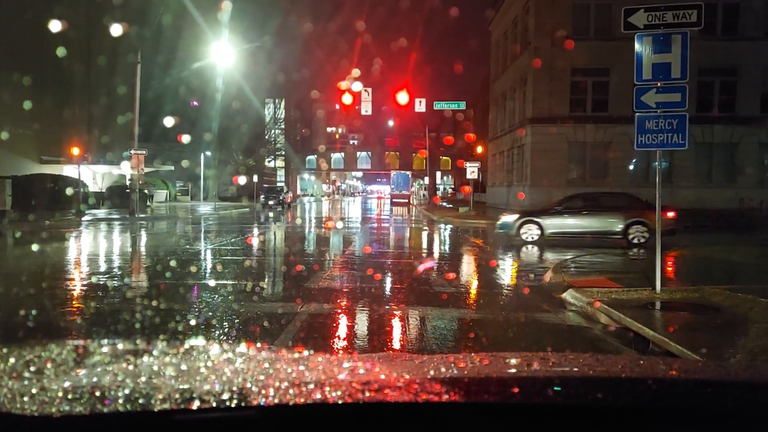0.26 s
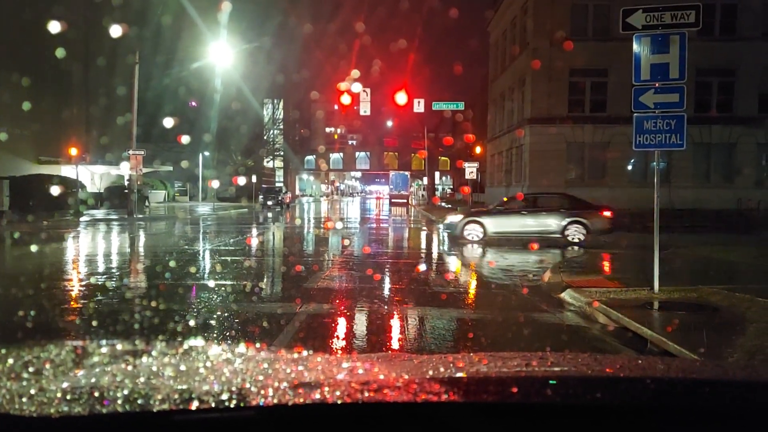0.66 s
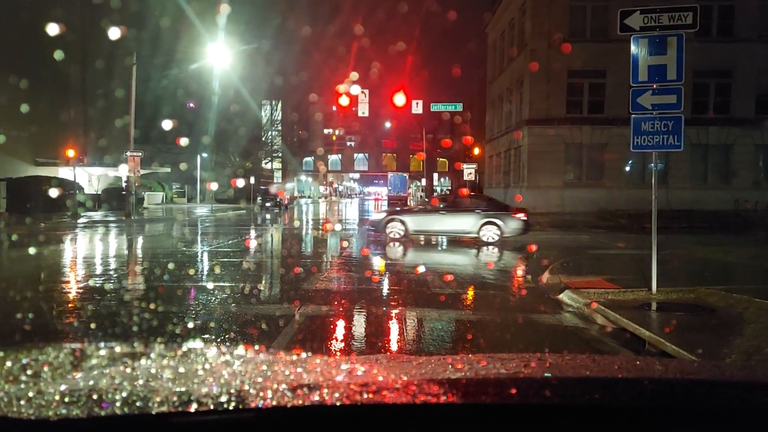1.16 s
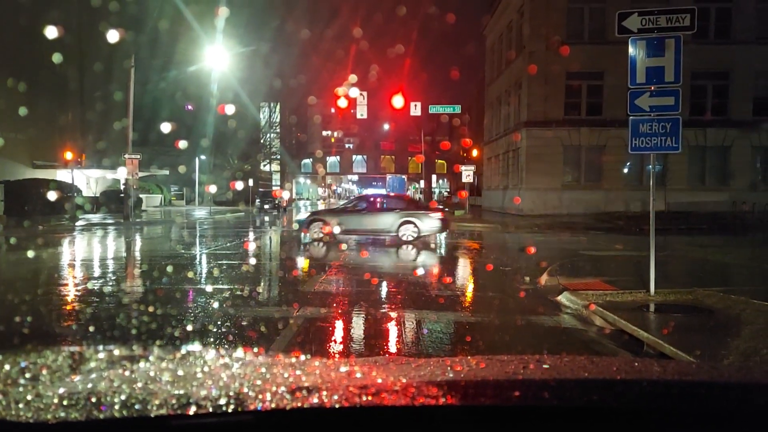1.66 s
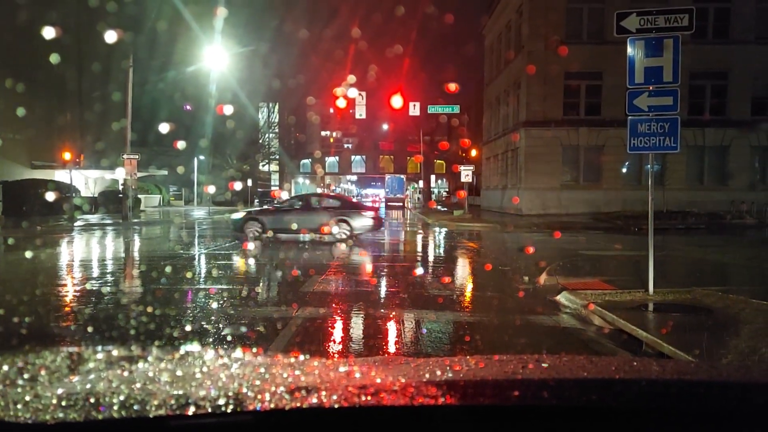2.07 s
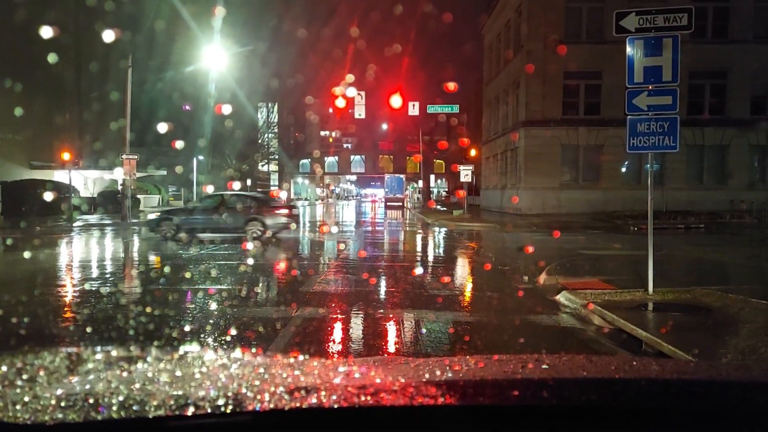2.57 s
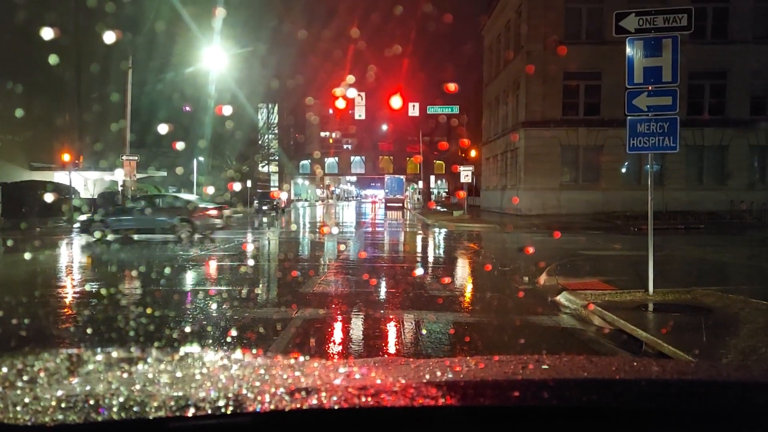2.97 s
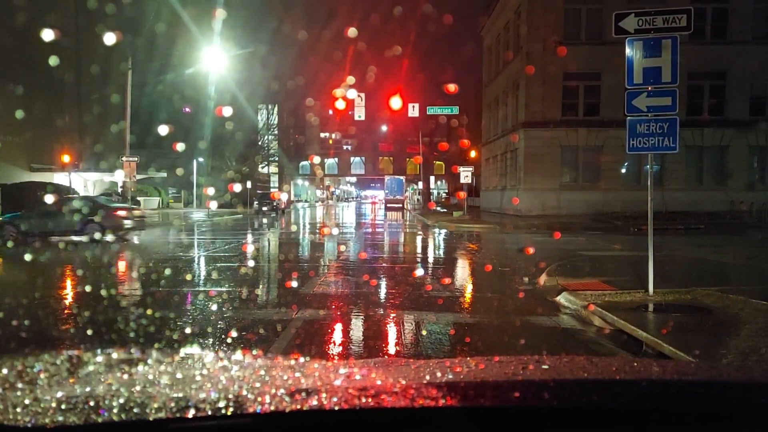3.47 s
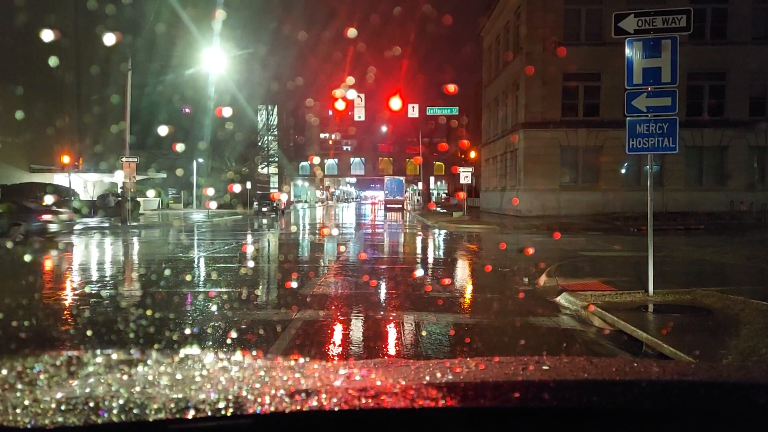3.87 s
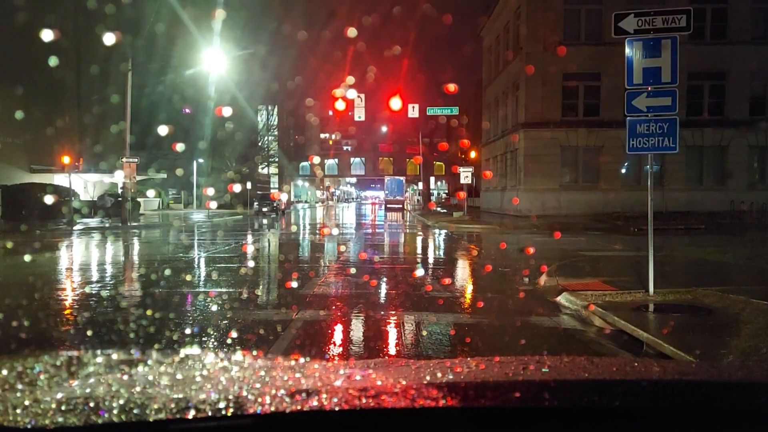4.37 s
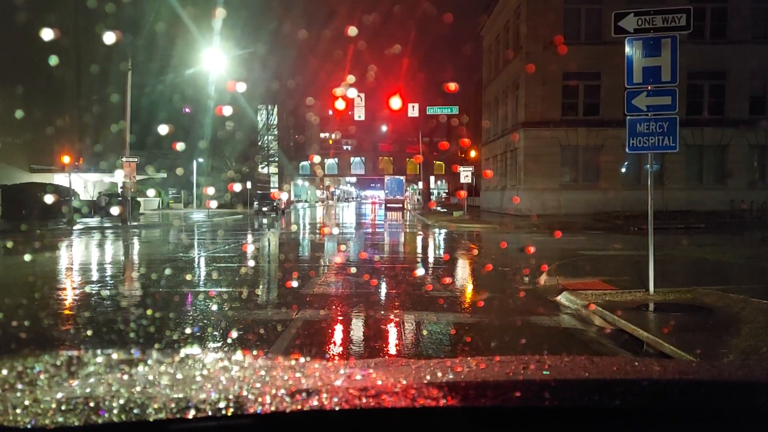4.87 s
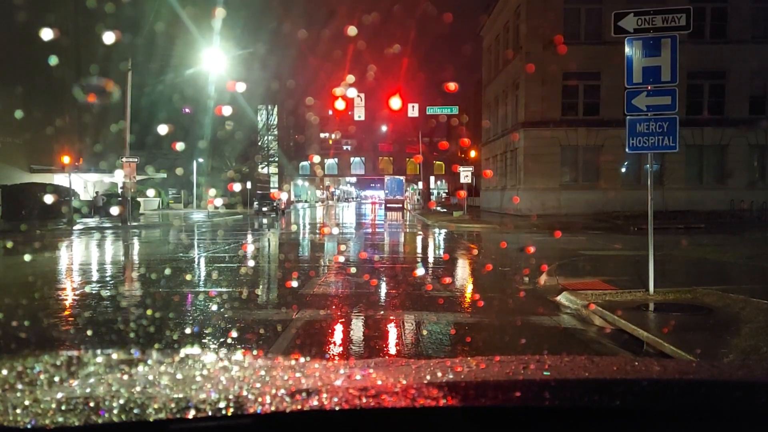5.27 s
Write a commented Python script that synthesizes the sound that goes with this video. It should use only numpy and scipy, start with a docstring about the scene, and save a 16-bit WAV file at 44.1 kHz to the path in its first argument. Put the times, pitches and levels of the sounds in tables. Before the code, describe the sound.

From inside a small padded car cabin, an idling engine and fan hum steadily beneath the dull wash of a wet street. Close, irregular raindrops crack on the windshield and knock on the roof, with smaller drops pattering and drumming between them. The rain starts busy and then eases slightly, each drop dying away quickly. A little past halfway, a thin, barely audible electronic whine sets in.

```python
"""The front seats of a standing car, in the rain, with the engine idling.
Big drops tick sharply on the windshield and thud on the lined steel roof, over a fine patter that
comes in waves. The small padded cabin answers each drop briefly. Underneath lie the hum of engine
and fan and the dull wash of the wet street; a faint electronic whine sets in later."""
import sys
import numpy as np
from scipy import signal
from scipy.fft import rfft, irfft, next_fast_len
from scipy.io import wavfile
from scipy.ndimage import map_coordinates

SR = 44100
rng = np.random.default_rng(int(sys.argv[2]) if len(sys.argv) > 2 else 0)


def wav_record(signal):
    """Record a signal, one row per channel, as 16-bit PCM in the file named by sys.argv[1]."""
    frames = np.transpose(np.atleast_2d(signal))
    bounded = np.clip(frames, -1, 1)
    # unit amplitude maps onto the largest positive 16-bit level
    quanta = np.round(bounded * 32767).astype(np.int16)
    wavfile.write(sys.argv[1], SR, quanta)


N = 244314
TIME_S = np.arange(N) / SR
DROP_TIME_S = np.arange(5120) / SR  # the span of one drop and its tail


def amp(db):
    """Decibels to gain."""
    return 10 ** (np.asarray(db) / 20)


def unit(x):
    """Scale to rms 1."""
    return x / np.sqrt(np.mean(x ** 2) + 1e-20)


def along(points, hz):
    """Read a curve of (freq_hz, value) points on a log frequency axis."""
    freqs, values = np.transpose(points)
    return np.interp(np.log(hz + 1), np.log(freqs + 1), values)


def bump(hz, centre_hz, width_hz):
    """The bell of one resonance, 1 at its centre."""
    return 1 / (1 + (2 * (hz - centre_hz) / width_hz) ** 2)


def wobble(rate_hz):
    """A smooth random drift through rate_hz points a second."""
    coarse = np.linspace(0, N * rate_hz / SR, N // 256)
    knots = rng.standard_normal(int(N * rate_hz / SR) + 4)
    return np.interp(TIME_S * rate_hz, coarse, map_coordinates(knots, [coarse]))


def pan(left_db):
    """Stereo gains that put the left side left_db above the right."""
    return amp(np.array([[left_db], [-left_db]]) / 2)


def eq(x, gain_db):
    """Minimum-phase EQ with the curve gain_db(hz): nothing rings ahead of a hit."""
    size = 2 * next_fast_len(x.shape[-1] // 2 + len(DROP_TIME_S) // 2)
    cepstrum = irfft(np.log(amp(gain_db(np.fft.rfftfreq(size, 1 / SR))) + 1e-6))
    cepstrum[1:size // 2] *= 2
    cepstrum[size // 2 + 1:] = 0
    return irfft(rfft(x, size) * np.exp(rfft(cepstrum)), size)[..., :x.shape[-1]]


def add(track, start_s, sound):
    """Mix a sound into the track at start_s."""
    start = int(np.clip(round(start_s * SR), 0, N - 1))
    track[:, start:start + sound.shape[1]] += sound[:, :N - start]


# How alike left and right are in the cabin: freq_hz, correlation
STEREO_LIKENESS = [(60, 0.93), (150, 0.88), (350, 0.71), (700, 0.4), (1400, -0.13), (3000, 0.013),
                   (8000, -0.048)]

def cabin_noise(size):
    """Diffuse white noise: nearly mono in the bass, wide in the treble."""
    correlation = along(STEREO_LIKENESS, np.fft.rfftfreq(size, 1 / SR))
    angle = np.arccos(correlation) / 2
    mid, side = irfft(rfft(rng.standard_normal((2, size))) * [np.cos(angle), np.sin(angle)], size)
    return np.array([mid + side, mid - side])


# EQ of the background bed: freq_hz, gain_db
WASH_EQ = [(25, -23), (35, -7.5), (52, 12), (72, -5), (120, 2), (160, -12.5), (300, -5.5), (700, -34),
           (3200, -24.5), (4500, -37.5), (9000, -48), (15500, -54)]

def street_wash(level_db=-52):
    """The rumble of the car body and the dull wash of the wet street outside."""
    bed = unit(eq(cabin_noise(N), lambda hz: along(WASH_EQ, hz)))
    return amp(level_db) * bed * pan(0.28)


# When the whine sounds: start_s, end_s
WHINE_CUES = [(3.33, 4.93), (4.97, 5.6)]

def electronic_whine(level_db=-77.5, centre_hz=10850, width_hz=900, line_db=-19, fade_s=0.022):
    """A thin whine: evenly spaced tones in a narrow band of hiss."""
    hiss = unit(eq(rng.standard_normal((2, N)), lambda hz: 20 * np.log10(bump(hz, centre_hz, width_hz))))
    lines = sum(np.sqrt(2) * np.sin(2 * np.pi * hz * TIME_S) for hz in range(10200, 11001, 200))
    gate = sum(np.clip(np.minimum(TIME_S - start_s, end_s - TIME_S) / fade_s, 0, 1)
               for start_s, end_s in WHINE_CUES)
    return amp(level_db) * gate * (hiss + amp(line_db) * lines)


# Harmonics of the idle: firing_multiple, level_db
IDLE_HARMONICS = [(1, -63), (2, -49.5), (3, -54.5), (4, -56), (5, -50), (6, -52)]
# Tones of the cooling fan: pitch_hz, level_db
FAN_TONES = [(98, -52), (196, -64.5)]

def engine(firing_hz=20.87, drift_hz=0.12, flutter_db=2.5):
    """The idling engine and its fan hum through the body, slightly unsteady."""
    firings = firing_hz * TIME_S + np.cumsum(drift_hz * wobble(3.0)) / SR
    idle = [(round(k) * firing_hz, round(k) * firings, db) for k, db in IDLE_HARMONICS]
    fan = [(hz, hz * TIME_S, db) for hz, db in FAN_TONES]
    lean = [(45, 1), (90, 3.7), (130, 1.9)]  # standing waves pull the hum left: freq_hz, left_db
    out = np.zeros((2, N))
    for hz, cycles, level_db in idle + fan:
        tone = np.sqrt(2) * np.sin(2 * np.pi * (cycles + rng.random()))
        out += pan(along(lean, hz)) * amp(level_db + flutter_db * wobble(4.06)) * tone
    return out


# Reverb of the padded cabin, before each drop's tail_scale: freq_hz, t60_s
CABIN_DECAY = [(150, 0.4), (500, 0.14), (3000, 0.11), (12000, 0.081)]

def impact(direct_db, echo_db, tail_scale, spread_s=0.0002246, echo_s=0.0027):
    """One drop at unit energy: a direct click, its bounce off the dashboard and the cabin's tail."""
    hz, age_s, spectrum = signal.stft(cabin_noise(len(DROP_TIME_S)), SR, nperseg=128)
    t60_s = tail_scale * along(CABIN_DECAY, hz)[:, None]
    _, tail = signal.istft(spectrum * amp(-60 * age_s / t60_s), SR, nperseg=128)
    tail = tail[:, :len(DROP_TIME_S)]
    bearing, path = rng.uniform(-0.98, 1, 2)
    arrival_s = spread_s * (1 + bearing * np.array([[1], [-1]]))
    click = amp(direct_db) * np.sinc((DROP_TIME_S - arrival_s) * SR)
    bounce = amp(echo_db) * np.sinc((DROP_TIME_S - arrival_s - echo_s * (1 + 0.232 * path)) * SR)
    hit = click + bounce + tail / np.linalg.norm(tail[0])
    return hit / np.sqrt(np.sum(hit ** 2) / 2)


# Resonances of the steel roof sheet: centre_hz, width_hz, strength_db
SHEET_MODES = [(221, 18, -2), (357, 53, -5.5), (509, 37, 1), (742, 55, 3.5), (1129, 56, 3.5),
               (1374, 28, 4.5)]

def sheet_db(hz):
    """The lift that the roof's resonances give to each frequency."""
    lift = sum(amp(db) * bump(hz, centre_hz, width_hz) for centre_hz, width_hz, db in SHEET_MODES)
    return 20 * np.log10(1 + lift)


def spray_power(send_db=-33, rise_s=0.0072, decay_s=0.012):
    """Fine spray falls back after each big drop: a quick swell of power for the patter."""
    power = np.zeros(N)
    for start_s, level_db, *_ in WINDSHIELD_HITS + ROOF_HITS:
        age_s = np.maximum(TIME_S - start_s, 0)
        power += amp(level_db + send_db) ** 2 * (1 - np.exp(-age_s / rise_s)) * np.exp(-age_s / decay_s)
    return power


# Fader ride of the shower: time_s, level_db
SHOWER_RIDE = [(0.0, -50), (0.14, -54), (0.72, -54.5), (1.11, -54.5), (1.56, -59), (1.96, -56), (2.33, -66),
               (2.57, -63), (2.79, -58.5), (3.02, -65), (3.47, -62), (3.75, -65.5), (4.1, -60),
               (4.74, -57.5), (4.86, -55), (4.97, -69), (5.18, -56.5), (5.54, -68.5)]
# Brief lulls in the rain: centre_s
LULL_CUES = [.085, .73, 1.67, 2.41, 2.74, 3.54, 5.14]

def rain_strength_db(lull_db=-7.5, lull_half_s=0.046):
    """The rain comes in waves, dips in the lulls and swells with the spray of the big drops."""
    shower_db = np.interp(TIME_S, *np.transpose(SHOWER_RIDE))
    lulls = sum(np.exp(-((TIME_S - centre_s) / lull_half_s) ** 2) for centre_s in LULL_CUES)
    return 10 * np.log10(amp(shower_db + lull_db * lulls) ** 2 + spray_power())


def scatter(rate_hz, spread_db, cap_db, direct_db, tail_scale, tint_db, spots):
    """Small drops land at random on a few spots of a panel, each spot with its own tint; rms 1."""
    octaves_hz = 125 * 2 ** np.arange(8)
    tints = [np.column_stack([octaves_hz, tint_db * rng.standard_normal(8)]) for _ in range(spots)]
    responses = [eq(impact(direct_db, direct_db - 4.5, tail_scale), lambda hz: along(tint, hz))
                 for tint in tints]
    moment, weight, place = rng.random((int(rate_hz * N / SR), 3)).T
    size = amp(np.minimum(-spread_db * np.log(1 - weight), cap_db))  # large drops are rare
    out = np.zeros((2, N))
    for spot, response in enumerate(responses):
        here = (place * spots).astype(int) == spot
        blows = np.bincount((moment[here] * N).astype(int), size[here], N)
        out += signal.oaconvolve(blows[None], response, axes=1)[:, :N]
    return unit(out)


# EQ of the small drops on the roof: freq_hz, gain_db
DRUM_EQ = [(70, -21), (125, 3), (160, -4), (220, -5), (380, -8), (600, -15), (850, -22.5), (1200, -20),
           (2000, -46), (4000, -48.5)]
# EQ of the small drops on the glass: freq_hz, gain_db
PATTER_EQ = [(400, -9.5), (700, 3), (900, -2), (1500, 0), (2400, -1), (3200, -1.5), (4400, -9.5),
             (6000, -13.5), (8500, -16.5), (9700, -24), (12700, -22), (13500, -28), (15600, -30)]

def small_drops(drum_db=-48, patter_gain_db=4, drum_follow=0.28):
    """Small drops patter on the glass and drum on the roof; the drumming follows the rain less steeply."""
    rain_db = rain_strength_db()
    drum_ride_db = drum_follow * (rain_db - rain_db.mean())
    drum = scatter(rate_hz=220, spread_db=4.5, cap_db=10.8, direct_db=-9,
                   tail_scale=0.87, tint_db=3, spots=10)
    drum = unit(eq(drum, lambda hz: along(DRUM_EQ, hz) + 0.87 * sheet_db(hz)))
    patter = scatter(rate_hz=420, spread_db=5, cap_db=15, direct_db=-2,
                     tail_scale=0.59, tint_db=2.5, spots=18)
    patter = unit(eq(patter, lambda hz: along(PATTER_EQ, hz)))
    return (amp(drum_ride_db + drum_db) * drum * pan(1.4)
            + amp(rain_db + patter_gain_db) * patter * pan(-1.1))


def dispersed(x, travel_s):
    """Bending waves cross a thin sheet more slowly the lower they are; travel_s is the delay at 1 kHz."""
    size = 2 * x.shape[-1]
    khz = np.fft.rfftfreq(size, 1 / SR) / 1000
    lag_cycles = 2000 * travel_s * np.sqrt(khz)
    return irfft(rfft(x, size) * np.exp(-2j * np.pi * lag_cycles), size)[..., :size // 2]


def steel_mode(pitch_hz, t60_s, attack_s=0.00071):
    """One mode of the steel, struck and dying away."""
    envelope = amp(-60 * DROP_TIME_S / t60_s) * (1 - np.exp(-DROP_TIME_S / attack_s))
    return envelope * np.sin(2 * np.pi * pitch_hz * DROP_TIME_S)


# EQ of a thud through the roof lining: freq_hz, gain_db
THUD_EQ = [(60, -2), (130, 3), (230, 5), (450, 2.5), (700, -0.5), (1200, -11.5), (3000, -16.5), (5000, -26),
           (8500, -34.5), (12500, -37.5), (15000, -66)]
# Big drops on the roof, levels relative: start_s, level_db, ring_hz, splash_db
ROOF_HITS = [(0.001, -21.5, 432, -20), (0.169, -21, 418, -14), (0.238, -29, 209, -9.5),
             (0.538, -28.5, 215, -14.5), (0.676, -30.5, 390, -11.5), (0.795, -29.5, 388, -9),
             (0.891, -19.5, 219, -15.5), (1.164, -27, 368, -15), (1.903, -39, 507, -9.5),
             (2.485, -31, 336, -10), (2.677, -28.5, 470, -17), (2.887, -23, 209, -15.5),
             (3.013, -31.5, 201, -14.5), (3.274, -30, 360, -25), (3.403, -26.5, 220, -23),
             (3.642, -25, 363.6, -21), (4.13, -25.5, 260.6, -24), (4.349, -35, 244, -26),
             (4.389, -26.5, 207, -16.5), (4.835, -33.5, 345, -15), (5, -28.5, 484, -13),
             (5.281, -20, 423, -23)]

def roof_drops(gain_db=22, ring_db=-31, boom_db=-41.5, boom_hz=177.8, plop_db=8, plop_centre_hz=1072):
    """Big drops thud through the lining with a hollow plop; the struck patch rings, the panel booms."""
    out = np.zeros((2, N))
    boom = amp(boom_db) * steel_mode(boom_hz, t60_s=0.22)
    for start_s, level_db, ring_hz, splash_db in ROOF_HITS:
        tilt = [(700, 0), (2000, splash_db + 26.5)]
        plop_hz = plop_centre_hz * 2 ** (0.2 * rng.uniform(-0.97, 1))  # within a fifth of an octave
        plop = lambda hz: plop_db * bump(hz, plop_hz, 0.24 * plop_hz)
        blow = dispersed(impact(direct_db=-9.5, echo_db=-38, tail_scale=1), travel_s=0.001435)
        thud = eq(blow, lambda hz: along(THUD_EQ, hz) + along(tilt, hz) + sheet_db(hz) + plop(hz))
        ring = amp(ring_db) * steel_mode(ring_hz, t60_s=0.082)
        add(out, start_s, amp(level_db + gain_db) * (thud + ring + boom))
    return out


def splashed(hit, droplet_db=-19.5, scatter_s=0.027, droplets=3):
    """A big drop bursts: its droplets land just after it, as quiet copies with the sides swapped."""
    out = hit.copy()
    for wait, size in rng.random((droplets, 2)):
        lag = int(scatter_s * (0.18 + wait) * SR) + 1
        out[:, lag:] += amp(droplet_db) * size * hit[::-1, :-lag]
    return out


# EQ of a tick on the glass: freq_hz, gain_db
TICK_EQ = [(80, 5.5), (200, 1.5), (700, 4.5), (1100, 4.5), (1700, 5.5), (2400, 2.5), (3200, 5.5),
           (4300, -2), (6000, -9), (8500, -14.5), (9800, -23), (12500, -19.5), (13500, -31), (16000, -53)]
# Big drops on the windshield, levels relative: start_s, level_db, body_db, sparkle_db, ping_hz
WINDSHIELD_HITS = [(0.0425, -19.5, -28, -19, 2050), (0.1138, -25.5, -30, -13, 3120),
                   (0.1249, -26.5, -15, -13, 2790), (0.1538, -27, -8, -8.5, 3180),
                   (0.2165, -30.5, 8.5, -10, 1320), (0.2726, -34.5, -12, -6, 2840),
                   (0.3211, -16, -1, -20, 2500), (0.348, -29, -16, -9, 2830),
                   (0.4192, -27.5, -15, -12, 3020), (0.4453, -27.5, -16, -33, 1900),
                   (0.47, -28.5, -10, -13, 3050), (0.776, -24, -5, -13.5, 3280), (0.8001, -26, 4, -9, 1900),
                   (0.8106, -31, 9, -9, 3480), (0.9791, -31, -31, -35, 3470), (1.496, -22.5, -1, -24, 2140),
                   (1.5501, -19, -4.5, -15, 2030), (1.799, -26.5, -23, -16.5, 2100),
                   (2.339, -37, 0, -15, 3040), (2.4844, -25, 3, -24.5, 1550), (2.791, -37, 8.5, -21, 1150),
                   (2.833, -30.5, 6, -11.5, 3060), (3.1376, -37, -8, -16, 3080),
                   (3.1836, -35, -19, -17, 2840), (3.852, -32.5, 4, -22, 1800),
                   (4.132, -23.5, -36, -19.5, 1750), (4.2203, -48, 15, 9, 2700),
                   (4.3904, -24.5, -17, -18.5, 1360), (4.4512, -33, -16, -20, 1420),
                   (4.78, -23.5, 5, -15.5, 3450), (4.9534, -35.5, -24, -18, 2200),
                   (4.977, -30.5, 3, -17, 3040), (5.26, -23, -3, -16, 2640)]

def windshield_drops(gain_db=14, ping_db=7):
    """Big drops crack on the glass, each with its own weight, brightness and short ping."""
    out = np.zeros((2, N))
    for start_s, level_db, body_db, sparkle_db, ping_hz in WINDSHIELD_HITS:
        low_shelf_db = 0.95 * (body_db + 4)
        high_shelf_db = 0.74 * (sparkle_db + 23)
        shelves = [(500, low_shelf_db), (1400, 0), (3500, 0), (7000, high_shelf_db)]
        ping = lambda hz: ping_db * bump(hz, ping_hz, 0.09 * ping_hz)
        crack = splashed(impact(direct_db=-2, echo_db=-10, tail_scale=0.72))
        tick = eq(crack, lambda hz: along(TICK_EQ, hz) + along(shelves, hz) + ping(hz))
        add(out, start_s, amp(level_db + gain_db) * pan(rng.normal(-1.8, 1.1)) * tick)
    return out


def scene():
    """The cabin mix: a bed of hum, wash and whine, with the rain on top."""
    bed = engine() + street_wash() + electronic_whine()
    return bed + windshield_drops() + roof_drops() + small_drops()


def record(dry):
    """A brick-wall high cut on the whole mix."""
    cutoff_hz = 15800
    size = next_fast_len(N + len(DROP_TIME_S))
    passband = np.fft.rfftfreq(size, 1 / SR) < cutoff_hz
    return irfft(rfft(dry, size) * passband, size)[:, :N]


dry = scene()
out = record(dry)
wav_record(out)
```